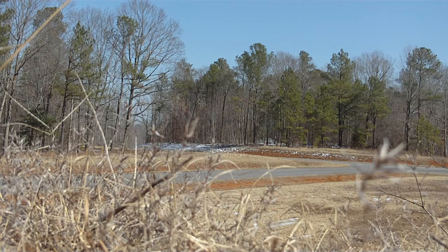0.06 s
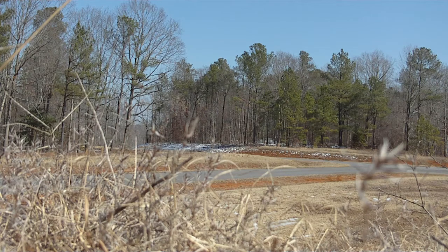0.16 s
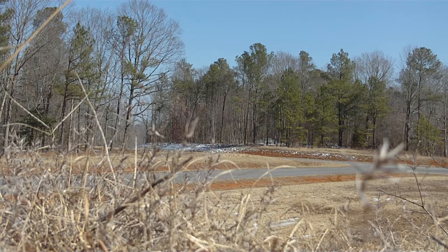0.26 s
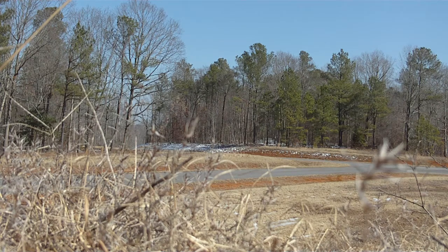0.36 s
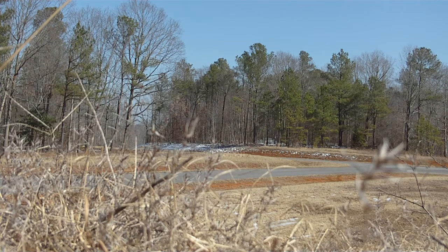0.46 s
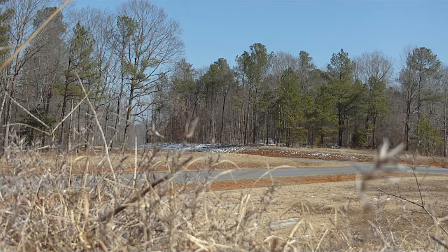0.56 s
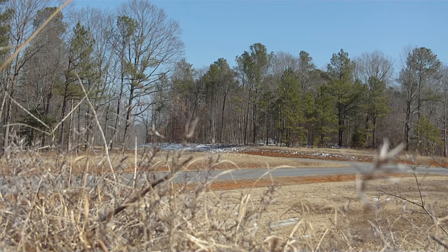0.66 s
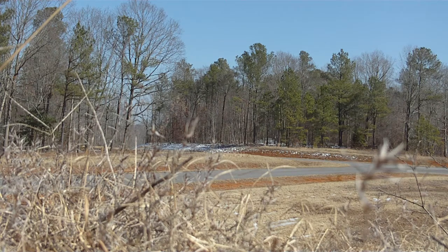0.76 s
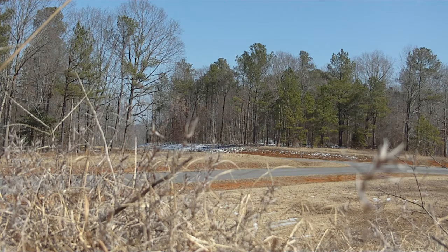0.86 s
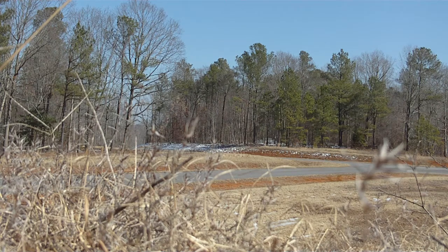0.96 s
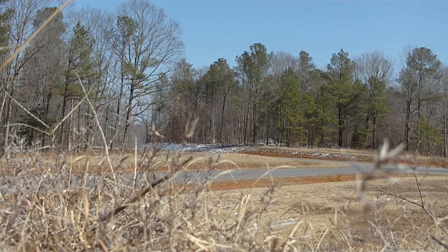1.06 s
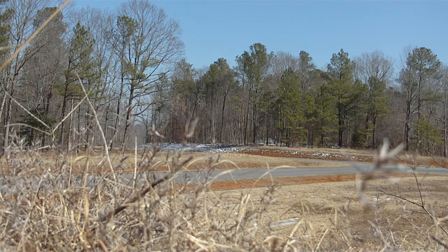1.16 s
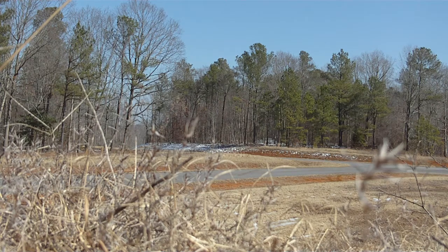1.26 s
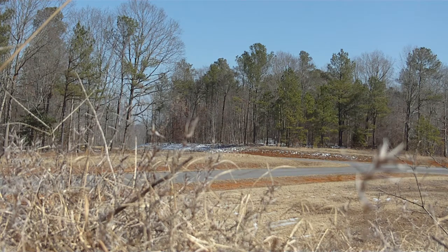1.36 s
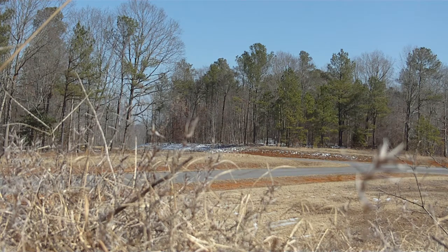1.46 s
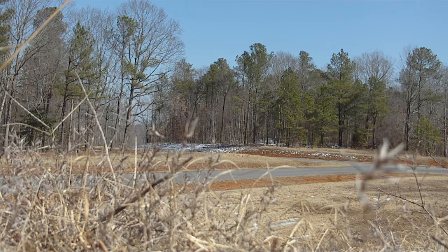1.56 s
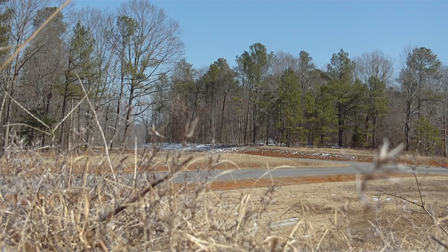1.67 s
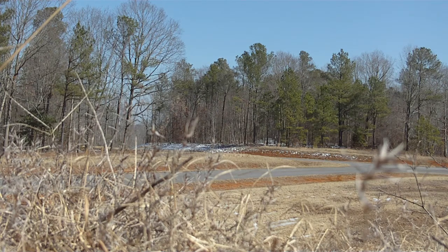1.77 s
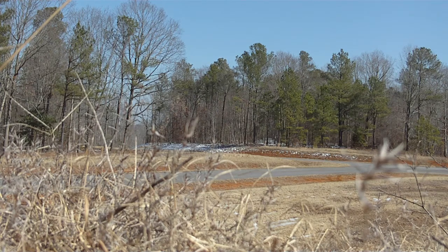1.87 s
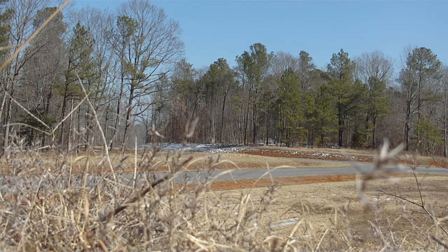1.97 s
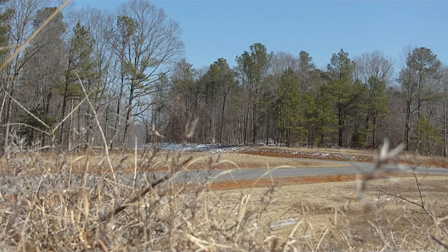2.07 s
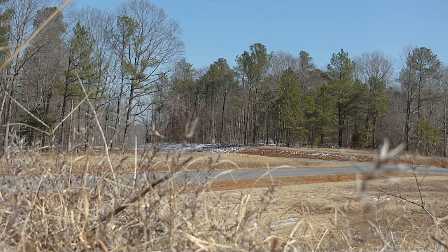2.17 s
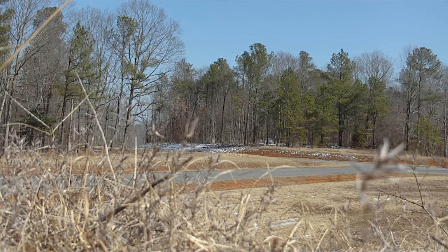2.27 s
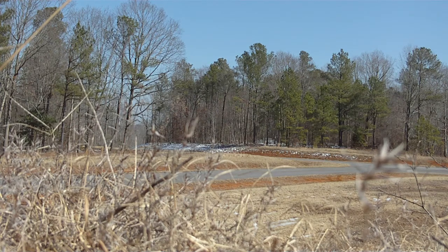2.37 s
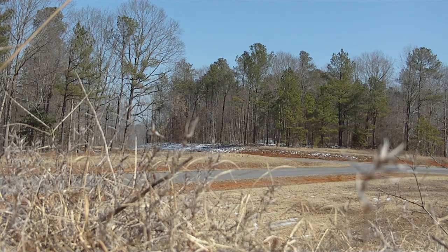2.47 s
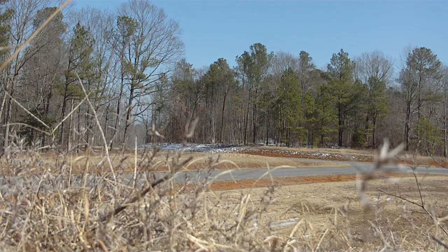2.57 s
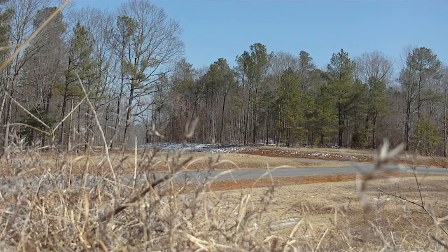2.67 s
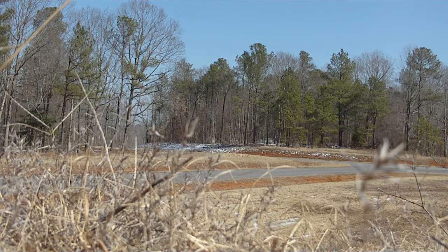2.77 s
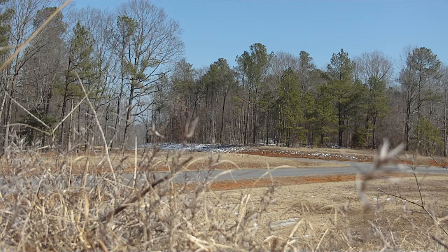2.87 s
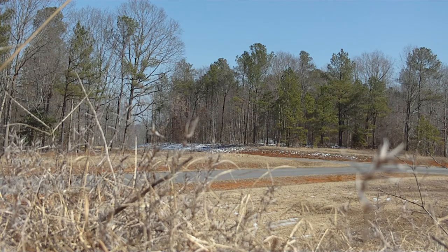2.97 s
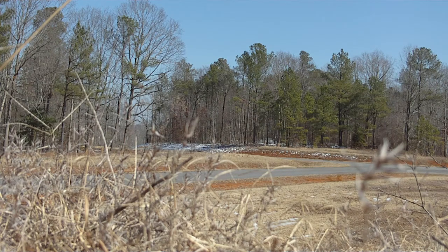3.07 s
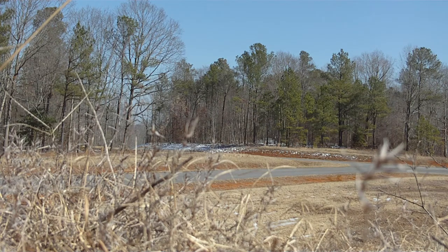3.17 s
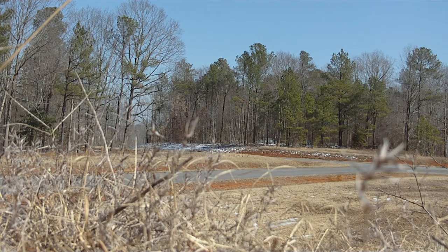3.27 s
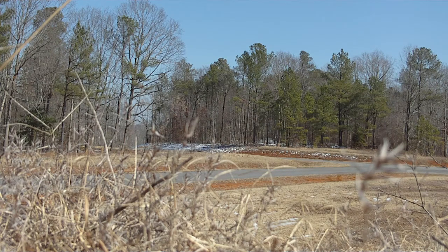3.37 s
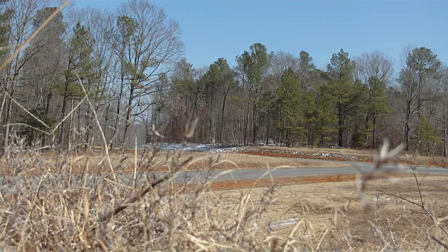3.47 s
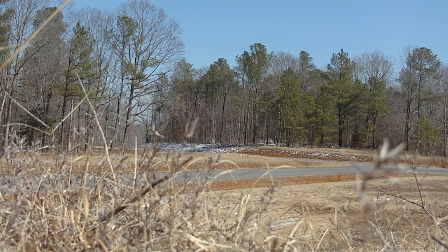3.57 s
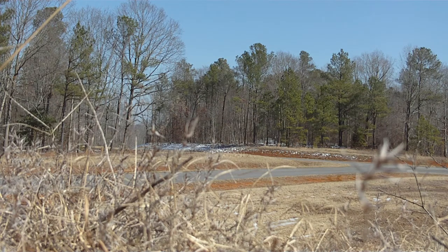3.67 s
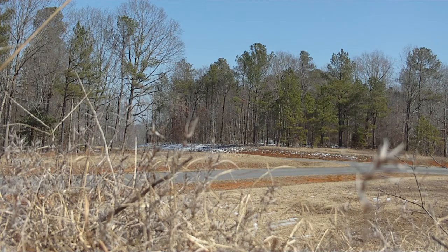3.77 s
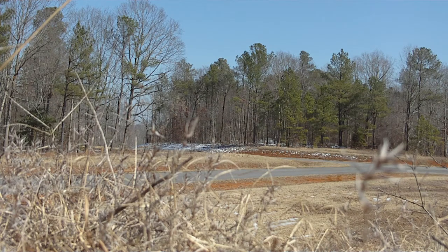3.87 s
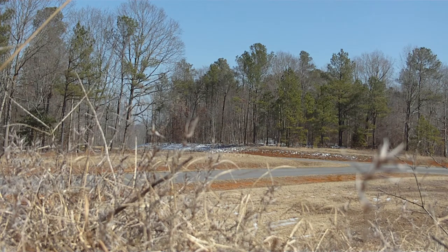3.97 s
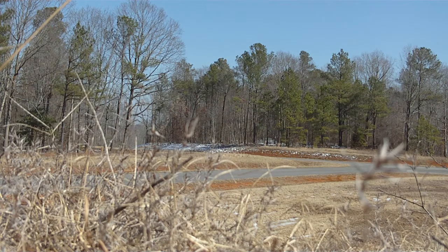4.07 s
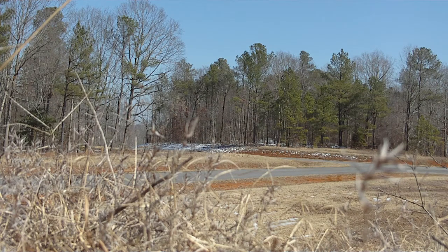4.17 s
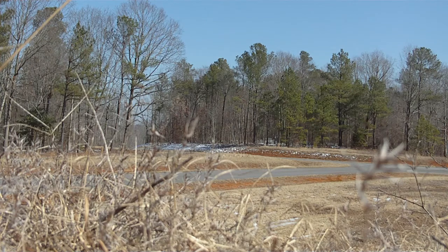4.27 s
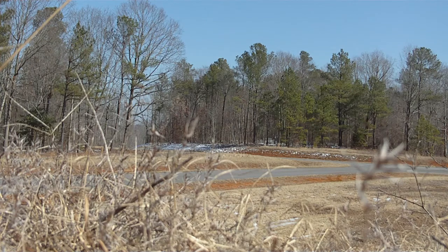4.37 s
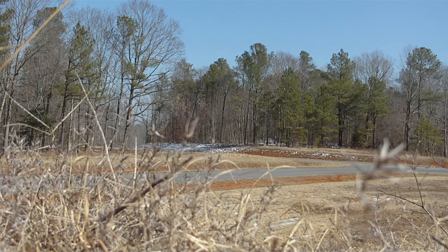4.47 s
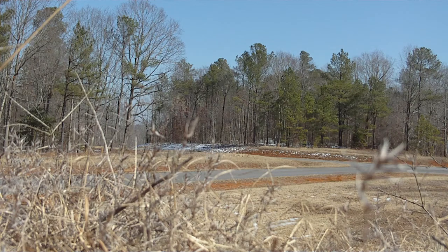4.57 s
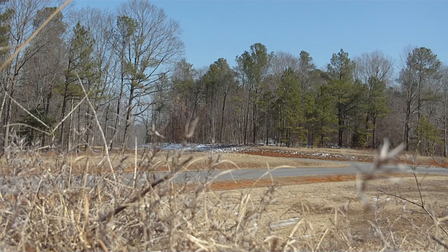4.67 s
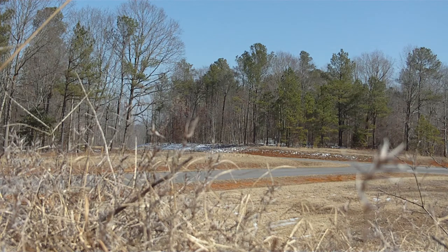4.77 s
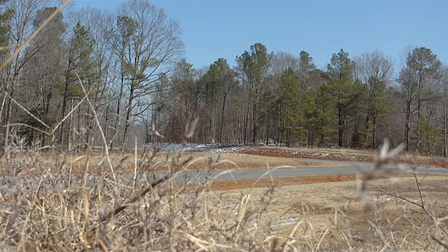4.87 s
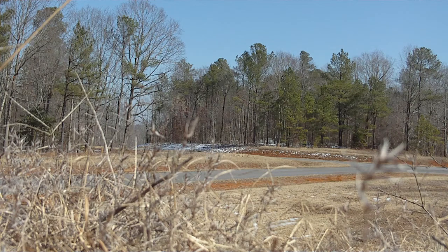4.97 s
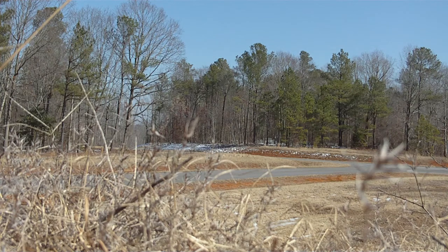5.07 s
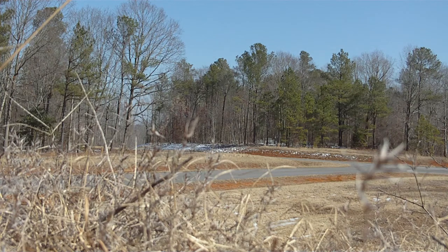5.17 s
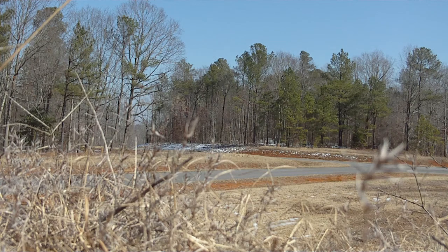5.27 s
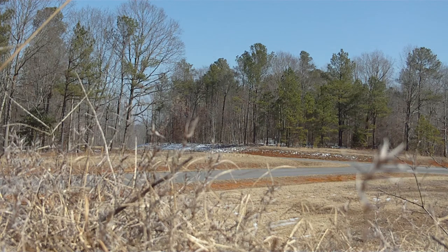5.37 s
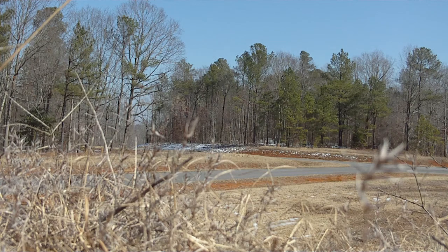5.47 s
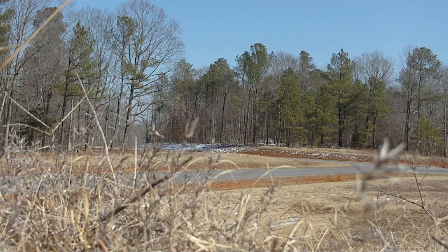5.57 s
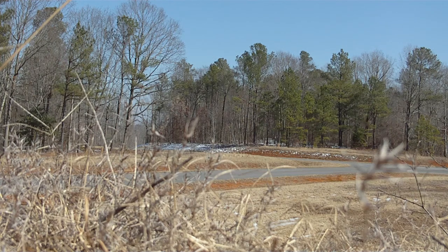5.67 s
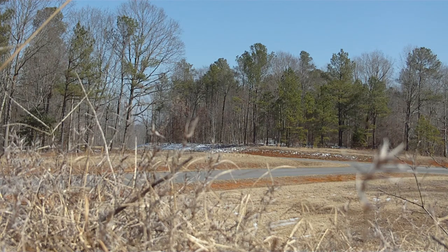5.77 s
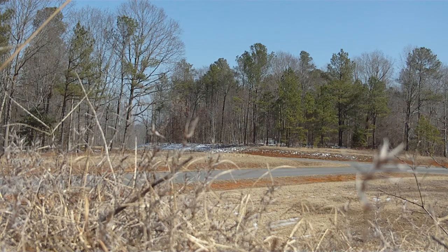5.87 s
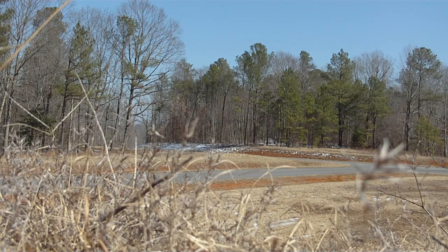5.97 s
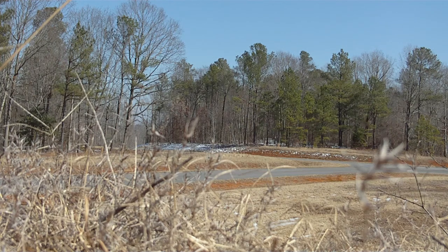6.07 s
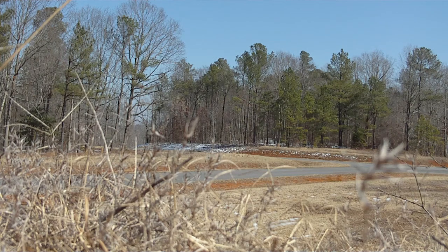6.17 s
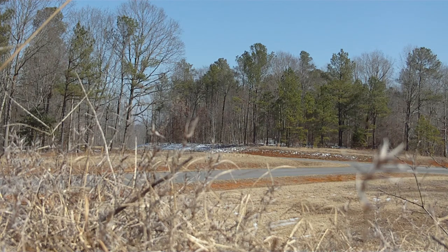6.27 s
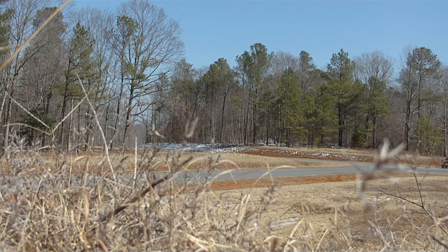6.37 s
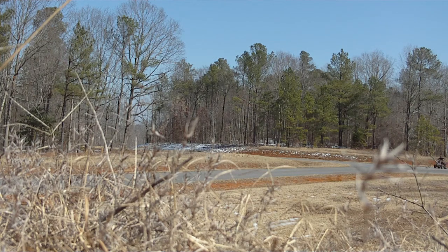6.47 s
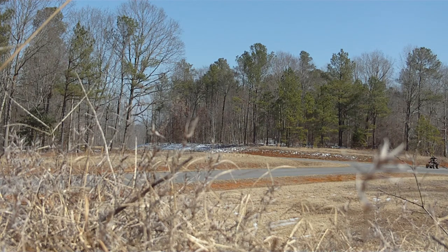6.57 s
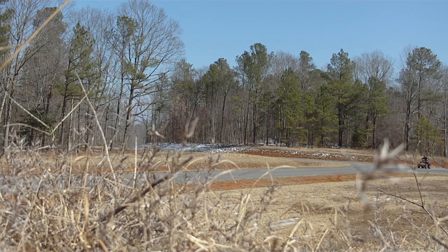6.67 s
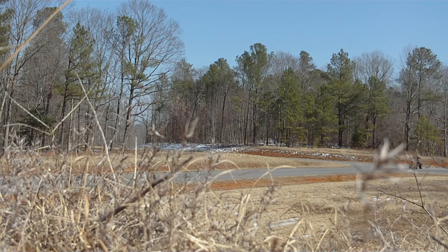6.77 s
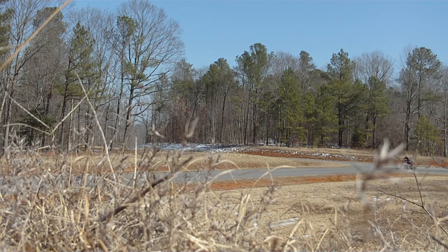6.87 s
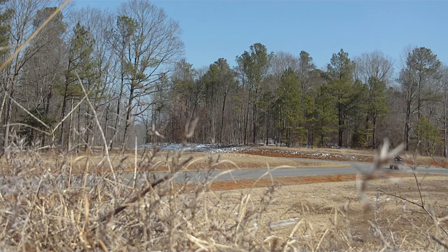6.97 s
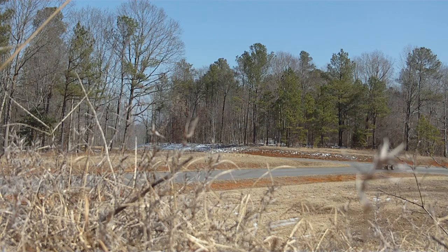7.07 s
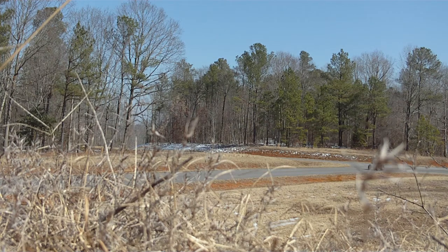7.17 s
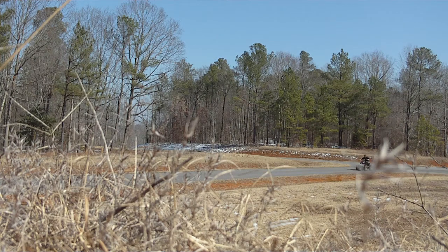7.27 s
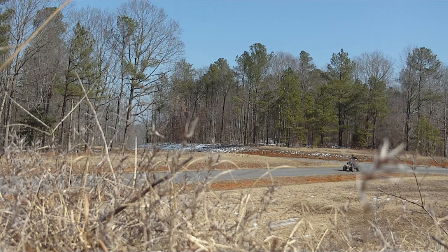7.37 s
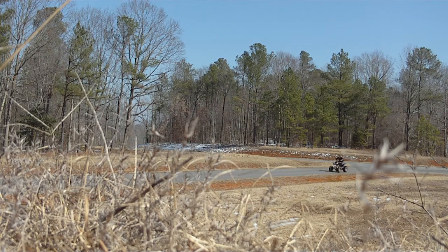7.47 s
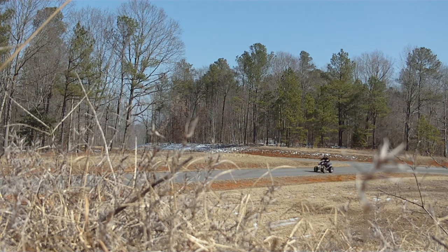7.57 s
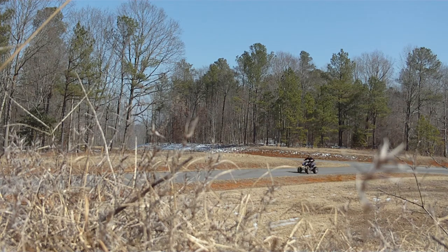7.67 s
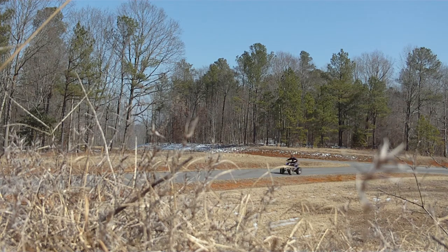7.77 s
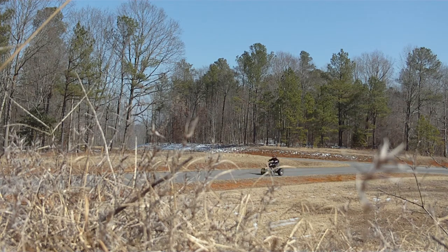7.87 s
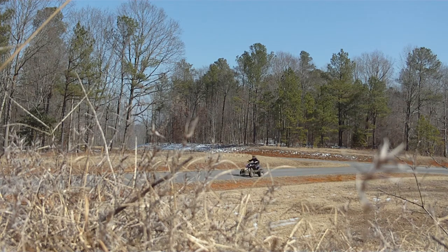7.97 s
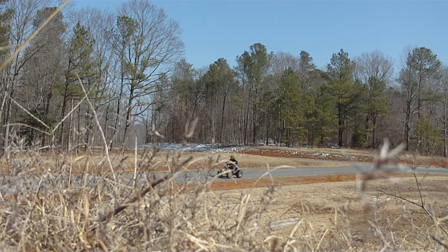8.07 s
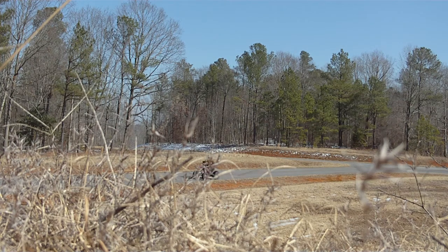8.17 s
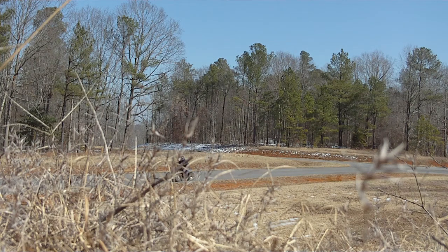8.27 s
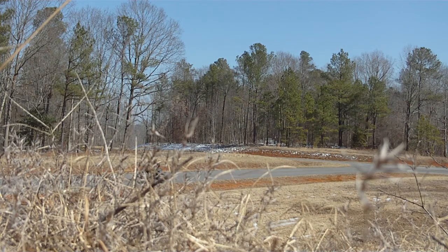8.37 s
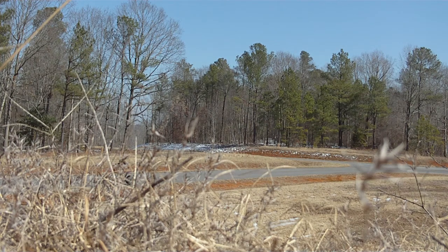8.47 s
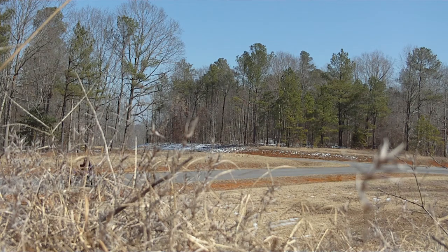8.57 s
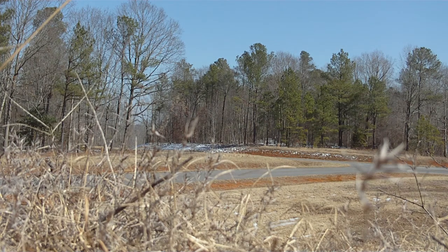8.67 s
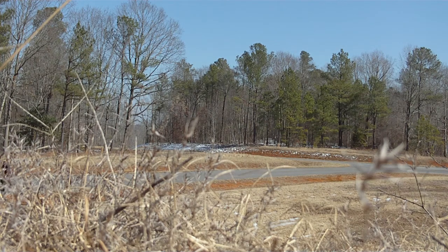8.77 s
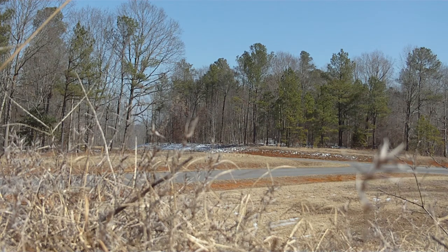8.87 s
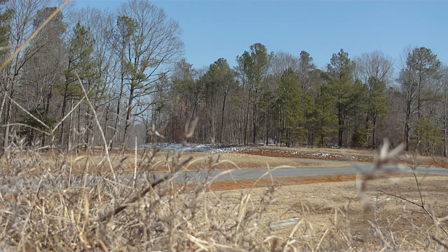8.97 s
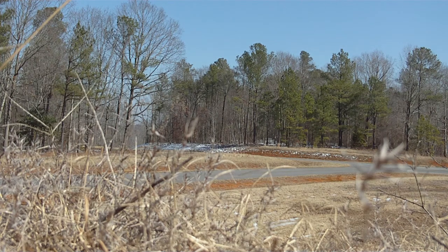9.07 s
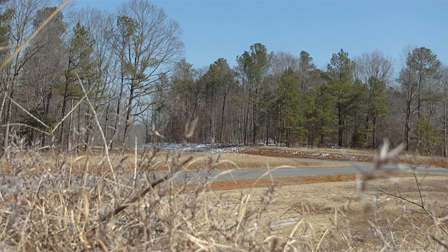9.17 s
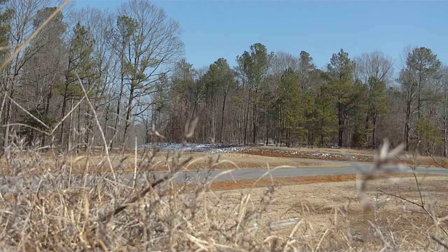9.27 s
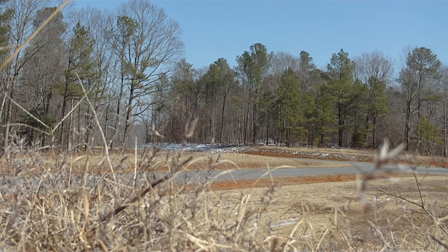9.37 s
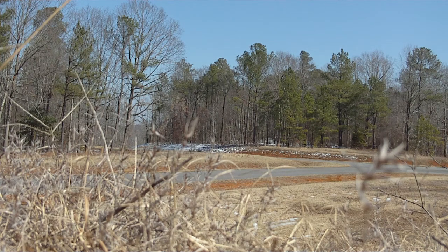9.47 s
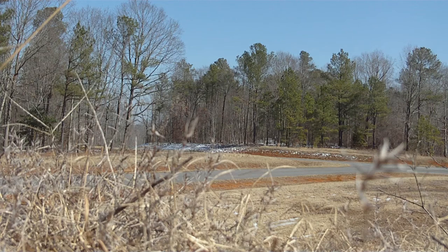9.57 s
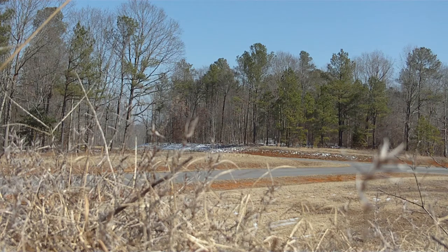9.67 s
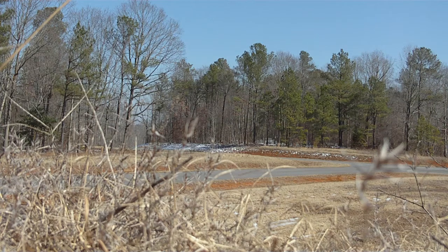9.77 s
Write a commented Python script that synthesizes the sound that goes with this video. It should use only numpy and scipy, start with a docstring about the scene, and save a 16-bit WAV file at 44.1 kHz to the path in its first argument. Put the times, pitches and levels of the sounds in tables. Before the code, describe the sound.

Distant quad engine shifts up, swells into a buzzing, rasping drone with humming knobbly tyres, then blasts by ragged and bright as the pitch falls.

```python
"""Two-stroke quad racing past

A single-cylinder quad races toward a roadside listener across a field ringed by trees, and another engine idles
far off. Head-on it changes up a gear and drones cleanly: low sine orders, with coloured gas noise for bark and rasp.
Its knobbly tyres hum at a multiple of the top-gear firing rate. As it draws level, uneven pulses and noise turn
the exhaust ragged and bright, the revs hitch and the pitch falls away."""
import sys
import numpy as np
from scipy import signal
from scipy.fft import rfft, irfft, next_fast_len
from scipy.io import wavfile
from scipy.ndimage import uniform_filter1d

SR = 44100
rng = np.random.default_rng(int(sys.argv[2]) if len(sys.argv) > 2 else 0)


def to_wav(s):
    """Save 16-bit WAV."""
    ch = np.atleast_2d(s).T  # columns
    pcm = np.round(np.clip(ch, -1, 1) * 32767)  # PCM
    wavfile.write(sys.argv[1], SR, pcm.astype(np.int16))


N = 433062
TIME = np.arange(N) / SR

# spectrum of the low outdoor rumble: f/Hz, level/dB
AIR_SPECTRUM = [(20, -4), (45, 2), (80, 0.5), (160, -6.5), (400, -16.5), (900, -21.5), (3000, -42)]
# steady tones of the distant idling engine: f/Hz, level/dB
IDLER_TONES = [(61, -42), (70, -40), (96.5, -45), (114, -53)]
# swell of the idling engine and the rumble: t/s, level/dB
BACKGROUND_SWELL = [(0, 0), (5, 0), (6.5, -2), (8, -8.5), (9.82, 2.5)]
# spectrum of the microphone electronics' hiss: f/Hz, level/dB
MIC_HISS_SPECTRUM = [(1000, -14), (4000, -0.5), (8000, -3), (11000, -0.5), (15000, -4)]
# steady whine of the microphone electronics: f/Hz, level/dB
WHINE_TONES = [(7900, -76.5), (11089, -71.5)]

# firing rate in top gear as the quad comes on, Doppler shift included: t/s, f/Hz
CRUISE_RATE = [(0, 127.6), (2.7, 128.4), (3.2, 129.5), (5.15, 129.6), (5.7, 132.5), (6.1, 133.3),
               (6.53, 131.7), (7.3, 134.5), (7.72, 135.7), (8.1, 136.8), (8.5, 137.3)]
# firing rate as it goes by, falling with two hitches of the revs: t/s, f/Hz
GOING_BY_RATE = [(8.85, 136.9), (8.89, 133.5), (8.98, 131.3), (9.125, 123.4), (9.175, 130.1), (9.26, 126.6),
                 (9.29, 129), (9.46, 119.4), (9.62, 113.7), (9.82, 108.7)]
# the revs flare and the pipe barks when the load drops, at the clutch or over a bump:
# t/s, rise/Hz, extra bark/dB
REV_FLARES = [(.68, 18.2, 1.5), (4.4, 1.001, 1), (5.42, 2.5, 1), (5.78, 5.9, 3), (6.27, 2, 2),
              (7.49, 5.6, 5.5)]
# how near the quad is, as loudness against its closest point: t/s, level/dB
NEARNESS_CURVE = [(0, -17.5), (1.2, -17.5), (2.7, -13.5), (4.3, -11.5), (5.1, -8), (5.6, -5), (6.3, -3),
                  (7.2, -.7), (8.8, 0)]

# tread hum, a row per order, before the wheels' own levels: level at the closest point/dB,
# gain per dB of nearness/dB, change after the last bump/dB, level going by/dB
TREAD_LEVELS = [(-30, 0.6, -4.5, -32.5), (-36.5, 1.5, 8, -31.5), (-34, 1.48, -1, -23)]

# drone, a row per engine order, before its colouring: level at the closest point/dB, gain per dB of nearness/dB
DRONE_LEVELS = [(-17.5, 0.92), (-19, .96), (-26.5, 1.6), (-29.5, 1.47)]
# the ground reflection colours the drone:
# t/s, weight moved from the second order to the first/dB, lift of the third order/dB
GROUND_COLOUR = [(0, 1, 4), (1.4, 0.5, -1.5), (2.7, 0.3, 1.5), (4.2, -.1, 0), (4.9, -3, -1), (5.5, 0, 1),
                 (6.8, -1.7, 0), (7.5, 0.1, -1), (7.9, -0.4, 1), (8.25, 2.5, 2.3), (8.8, 0.5, 1)]
# upper engine orders before the resonances: order, level head-on/dB, level from beside/dB
UPPER_ORDER_LEVELS = [(9, 2, 0.5), (10, 0, -2), (11, -3, 4), (12, 1.5, -10), (13, 1, -0.5), (14, 3, -4),
                      (15, 3.5, -6), (16, 1, 7.5), (17, 2, -15), (18, -1, 6), (19, 2.5, -4), (20, -2, 5.5),
                      (21, -5, 0), (22, 1, 4.5), (23, -3, 0), (24, -8, -10), (25, 3.5, 2)]

# head-on spectra of the pipe's bark, the metallic rasp, and the tyre and chain hiss: f/Hz, level/dB
BARK_AHEAD_SPECTRUM = [(30, -14), (60, -6), (170, -3), (250, 2.5), (320, 0.5), (450, 6), (580, -1.5),
                       (710, 3.5), (790, -8.5), (1000, -15.5), (1300, -28)]
RASP_AHEAD_SPECTRUM = [(900, -7), (1100, -3.5), (1230, -0.5), (1420, 3.5), (1550, 1), (1670, 1.5),
                       (1900, -3.5), (2150, -1.5), (2380, 3), (2700, -2.5), (3000, -5), (3350, -17),
                       (4000, -15.5), (4600, -30)]
HISS_AHEAD_SPECTRUM = [(2650, -33), (4500, -4.5), (4950, -2), (5690, -2.5), (6100, -7), (6590, 1),
                       (7520, 0.5), (7930, -1), (8570, -10.5), (10100, -13), (12000, -28), (15600, -53),
                       (22000, -120)]
# rasp on the approach, before its treble lift: t/s, level/dB
RASP_CURVE = [(0.1, -57.5), (0.72, -53.5), (4.77, -45), (4.79, -44), (5.73, -41.5), (6.92, -34.5),
              (7.88, -35.5), (7.96, -32.5), (8.7, -33)]
# tilt of the rasp about 2 kHz as the cylinder comes into the open: t/s, treble over bass/dB
RASP_TREBLE_LIFT = [(0, -7), (1.2, -4), (3, -2.5), (5, -1), (6, -4), (7, 3), (7.6, 4), (8.1, 4), (8.8, 7)]
# tyre and chain hiss on the approach, before its trim and distance loss: t/s, level/dB
HISS_CURVE = [(5.5, -67), (5.96, -64), (6.13, -56), (6.34, -63.5), (7.08, -49), (7.19, -52.5), (7.57, -51),
              (8.31, -53), (8.8, -52)]

# spectra from beside, from the pipe's boom up to the hiss: f/Hz, level/dB
BOOM_BESIDE_SPECTRUM = [(60, -16), (110, -8), (175, -16), (230, 0), (280, -2), (330, 2.5), (385, -5),
                        (440, 0), (520, -9), (620, -27)]
BARK_BESIDE_SPECTRUM = [(480, -19), (570, -2), (640, 7), (720, 4), (790, -1), (930, -6), (1080, -19),
                        (1300, -33)]
RASP_BESIDE_SPECTRUM = [(950, -21), (1100, -2), (1250, -4), (1400, 2), (1520, 3), (1680, 3), (1820, 1),
                        (1980, -15), (2200, -13)]
RING_BESIDE_SPECTRUM = [(1950, -17), (2120, -2), (2350, 4), (2560, 1.5), (2700, -4), (2900, -0.5),
                        (3200, -6.5), (3700, -10), (4400, -29), (4800, -35)]
HISS_BESIDE_SPECTRUM = [(2650, -30), (4500, -9.5), (4730, -18), (5310, -1.5), (5560, 2.5), (6430, -9.5),
                        (7640, -3), (7990, -8.5), (8490, -16.5), (11500, -25), (12000, -34), (13700, -30),
                        (15000, -38)]

# the change up: the throttle shuts for a moment, the revs sink, and the drone jumps as the clutch bites again
SHIFT_AT_S, SHIFT_WIDTH_S, SHIFT_DIP_DB = 0.555, 0.052, -19
LOW_GEAR_RATIO, IN_GEAR_AT_S, SETTLE_S = 1.16, 0.78, 0.09
BITE_AFTER_S, BITE_WIDTH_S, BITE_DB = 0.12, 0.08, 3
LOW_GEAR_OVERTONE_DB = -6   # the second order is weaker in the lower gear
FLARE_RISE_S, FLARE_FALL_S, FLARE_BARK_S = 0.055, 0.1, 0.44
# the middle of the drone swells; close by, the fourth order sinks into the ground reflection's notch
SURGE_AT_S, SURGE_WIDTH_S, SURGE_DB = 5.48, 0.39, 3.5
NOTCH_AT_S, NOTCH_WIDTH_S, NOTCH_DB = 8.7, 0.6, -10
# the pass: side-on, the throttle eases and reopens, then the tailpipe turns to the listener
LEVEL_AT_S = 8.86
EASE_AT_S, EASE_WIDTH_S = 9.08, 0.059
REOPEN_AT_S, REOPEN_WIDTH_S, REOPEN_DB = 9.22, 0.068, 2.5
TAIL_ON_AT_S, TURN_S = 9.46, 0.2
BEHIND_PITCH = 0.954   # the Doppler shift lowers the pipe's boom as the quad leaves
# tyre knobs slap the road at a multiple of the top-gear firing rate; going by, their pitch falls
KNOBS_PER_FIRING, DOPPLER_FALL, DOPPLER_S = 1.782, 0.235, 1.2
BUMP_AT_S, BUMP_WIDTH_S = 7.62, 0.1
TREAD_FROM_S, TREAD_FADE_S, TREAD_FAINT_DB = 1.1, 0.13, -17   # the hum's lowest order is faint at first
DIRECT_SHARE = 0.62   # share of the rasp's power that arrives as clean orders at the closest point
CLEAN_BESIDE = 0.6    # the same share for rasp and ring from beside
LEFT_AGAINST_RIGHT_DB = -9
CUTOFF_HZ = 15300


def from_db(db):
    """Decibels to gain."""
    return 10 ** (np.asarray(db) / 20)


def rms_one(x):
    """Scale to rms 1."""
    return x / np.sqrt(np.mean(x ** 2) + 1e-20)


def in_time(rows):
    """Each column of a curve table at every sample."""
    s, *columns = np.transpose(rows)
    return [np.interp(TIME, s, c) for c in columns]


def swell(at_s, width_s):
    """A bell in time, height 1."""
    return np.exp(-((TIME - at_s) / width_s) ** 2)


def step(at_s, width_s):
    """A smooth change from 0 to 1."""
    return 0.5 + 0.5 * np.tanh((TIME - at_s) / width_s)


def noise():
    """White noise."""
    return rng.standard_normal(N)


def drift(rate):
    """Smooth chance, changing about rate times a second; spread 1."""
    hop = 40   # samples between the slow points
    r = np.exp(-2 * np.pi * rate * hop / SR)
    chance = rng.standard_normal(N // hop + 2002)
    slow = signal.lfilter([1], [1, -2 * r, r * r], chance)[2000:]   # drop the filter's start-up
    return np.interp(np.arange(N) / hop, np.arange(len(slow)), rms_one(slow))


def colour(x, spectrum):
    """Give x a spectrum whose ends fall away steeply; rms 1."""
    size = next_fast_len(N + 8192)
    hz, db = np.transpose(spectrum)
    octave = np.log2(np.arange(size // 2 + 1) * SR / size + 1)
    points = np.log2(hz)
    outside = np.abs(octave - np.clip(octave, points[0], points[-1]))
    gain = from_db(np.interp(octave, points, db) - 17 * outside)   # 17 dB per octave beyond the ends
    return rms_one(irfft(rfft(x, size) * gain, size)[:N])


def blend(a, b, share):
    """Mix two sounds, with a share of the power from the first."""
    share = np.clip(share, 0, 1)
    return np.sqrt(share) * a + np.sqrt(1 - share) * b


def tone(turns, db):
    """A sine at an rms level."""
    return from_db(db) * np.sqrt(2) * np.sin(2 * np.pi * turns)


def electronics():
    """Faint hiss and whine of the microphone's electronics, the hiss part shared and part separate per side."""
    whine = sum(tone(hz * TIME, db) for hz, db in WHINE_TONES)
    separate = np.array([colour(noise(), MIC_HISS_SPECTRUM) for side in range(2)])
    shared = colour(noise(), MIC_HISS_SPECTRUM)
    return from_db(-62) * (separate + shared) + whine


def field():
    """Low outdoor rumble as coloured noise, and a distant idling engine as gently swaying sines."""
    swell_db, = in_time(BACKGROUND_SWELL)
    hum = sum(tone(hz * TIME + 0.39 * drift(1), db + 0.7 * drift(1.9)) for hz, db in IDLER_TONES)
    rumble = from_db(-38) * colour(noise(), AIR_SPECTRUM)
    return from_db(swell_db) * (hum + rumble)


def nearing(closest_db, follows):
    """Level of a layer that grows as the quad comes nearer."""
    near_db, = in_time(NEARNESS_CURVE)
    return closest_db + follows * near_db


def passing(side_db, behind_db, eased_db):
    """Level of a layer as the quad turns from side-on to tail-on, changed by eased_db while the throttle eases."""
    turning_db = (behind_db - side_db) * step(TAIL_ON_AT_S, TURN_S)
    return side_db + turning_db + eased_db * swell(EASE_AT_S, EASE_WIDTH_S)


def tread():
    """Knobbly tyres hum; front and rear wheels turn at slightly different, unsteady rates."""
    cruise, = in_time(CRUISE_RATE)
    doppler = 1 - DOPPLER_FALL * np.tanh(np.maximum(TIME - LEVEL_AT_S, 0) / DOPPLER_S)
    knobs = np.cumsum(KNOBS_PER_FIRING * cruise * doppler) / SR
    gone_by = step(8.93, 0.065)
    after_bump = step(BUMP_AT_S, BUMP_WIDTH_S)
    levels = []
    for closest_db, follows, bump_db, by_db in TREAD_LEVELS:
        coming_db = nearing(closest_db, follows) + bump_db * after_bump
        levels.append(coming_db * (1 - gone_by) + by_db * gone_by)
    levels[0] = levels[0] + TREAD_FAINT_DB * (1 - step(TREAD_FROM_S, TREAD_FADE_S))
    hum = 0
    for ratio, wheel_db, slip in [(1, -1.5, 0.026), (1.014, -8.5, 0.1)]:
        turns = ratio * knobs + slip * drift(10.2)
        for k, db in enumerate(levels, 1):
            hum = hum + tone(k * turns, db + wheel_db + 1.9 * drift(12.3))
    return hum


def low_gear():
    """1 in the lower gear, 0 once the revs have settled in top."""
    return 1 - step(IN_GEAR_AT_S, SETTLE_S)


def firing_rate():
    """Top-gear firing rate times the gear, plus flares that jump up and die away, in Hz."""
    rate, = in_time(CRUISE_RATE + GOING_BY_RATE)
    rate = rate * (1 + (LOW_GEAR_RATIO - 1) * low_gear())
    for s, rise_hz, _ in REV_FLARES:
        fall = np.exp(-np.abs(TIME - s) / FLARE_FALL_S)
        rate = rate + rise_hz * np.where(TIME < s, swell(s, FLARE_RISE_S), fall)
    return rate


def firings(turns, uneven_db, jitter_ms):
    """One pressure pulse a turn, each a little off in strength and timing."""
    chance = rng.standard_normal((2048, 2))
    whole = np.arange(1, int(turns[-1]))
    at = np.interp(whole, turns, np.arange(N)) + chance[whole, 0] * jitter_ms * SR / 1000
    at = np.clip(at, 0, N - 2)
    strength = from_db(uneven_db * chance[whole, 1])
    # share each pulse between the two nearest samples
    early, part = at.astype(int), at % 1
    pulses = np.bincount(early, strength * (1 - part), N) + np.bincount(early + 1, strength * part, N)
    return rms_one(pulses)


def puffs(turns, depth):
    """Turbulent gas noise that swells each time the exhaust port opens."""
    return rms_one(noise() * np.exp(depth * np.cos(2 * np.pi * turns)))


def upper_orders(turns, levels_db):
    """The sharp edge of each firing as a comb of orders, smeared in phase and fading over the changing ground path."""
    return [tone(k * turns + rng.random() + 0.06 * drift(17), db + 2.5 * drift(3.6))
            for k, db in enumerate(levels_db, 9)]


def scatter(x, t60, wet):
    """Brush and trunks return a thin, dying cloud of reflections."""
    t = TIME[:SR // 2]
    cloud = rng.standard_normal(len(t)) * from_db(-60 * t / t60) * (t > 0.004)
    return blend(x, signal.fftconvolve(x, cloud / np.linalg.norm(cloud))[:N], wet)


def hiss_ahead(turns):
    """Tyre and chain hiss as noise, pulsed at the firing rate; it does not carry far."""
    hiss_db, = in_time(HISS_CURVE)
    distance_db = np.minimum(nearing(5.3, 0.55), 0)
    level_db = hiss_db + 0.5 + distance_db + 1.34 * drift(11)
    return from_db(level_db) * colour(puffs(turns, depth=0.15), HISS_AHEAD_SPECTRUM)


def rasp_ahead(turns):
    """Metallic rasp: clean orders emerge from gas noise as the quad nears, and the treble opens up."""
    rasp_db, = in_time(RASP_CURVE)
    lift_db, = in_time(RASP_TREBLE_LIFT)
    direct = DIRECT_SHARE * from_db(nearing(0, 1))
    comb = rms_one(sum(upper_orders(turns, [row[1] for row in UPPER_ORDER_LEVELS])))
    gas = colour(puffs(turns, depth=0.067), RASP_AHEAD_SPECTRUM)
    rasp = blend(colour(comb, RASP_AHEAD_SPECTRUM), gas, direct)
    dull = signal.sosfiltfilt(signal.butter(2, 2000, fs=SR, output="sos"), rasp)
    tilted = from_db(-lift_db / 2) * dull + from_db(lift_db / 2) * (rasp - dull)
    return from_db(rasp_db + 0.5 * drift(8.3)) * tilted


def bark_ahead(turns):
    """Pipe bark: gas noise through the pipe's resonances, louder around each flare of the revs."""
    flare_db = sum(db * swell(s, FLARE_BARK_S) for s, _, db in REV_FLARES)
    bark_db = nearing(-31, 0.86) + flare_db
    return from_db(bark_db) * colour(puffs(turns, depth=0.089), BARK_AHEAD_SPECTRUM)


def drone(turns):
    """The four lowest orders of the exhaust as sines, shimmering in the air."""
    first_db, second_db, third_db, fourth_db = [nearing(*order) for order in DRONE_LEVELS]
    tilt_db, third_lift_db = in_time(GROUND_COLOUR)
    shift_db = SHIFT_DIP_DB * swell(SHIFT_AT_S, SHIFT_WIDTH_S)
    bite_db = BITE_DB * swell(SHIFT_AT_S + BITE_AFTER_S, BITE_WIDTH_S)
    surge_db = SURGE_DB * swell(SURGE_AT_S, SURGE_WIDTH_S)
    notch_db = NOTCH_DB * swell(NOTCH_AT_S, NOTCH_WIDTH_S)
    first_db = first_db + tilt_db + shift_db + bite_db
    second_db = second_db - tilt_db + LOW_GEAR_OVERTONE_DB * low_gear()
    levels = [first_db, second_db, third_db + third_lift_db + surge_db, fourth_db + surge_db + notch_db]
    shimmer_db = np.interp(TIME, [0, 5, 8], [0.7, 0.5, 0.35])
    wobble = 0.0057 * drift(23)
    first, *upper = [tone(k * (turns + wobble), db + shimmer_db * drift(13)) for k, db in enumerate(levels, 1)]
    # until the revs settle on the pipe's tuning, its resonances ring roughly instead of locking to the orders
    locked = np.clip((TIME - 0.8) / 0.26, 0, 1)
    resonances = [(274, 0.13, second_db + 0.5), (432, 0.18, third_db + 1)]
    loose = sum(tone(hz * TIME + sway * drift(21), db + 2 * drift(15)) for hz, sway, db in resonances)
    return first + blend(sum(upper), loose, locked)


def going_by(turns):
    """Beside and behind the open pipe: ragged firings ring the exhaust and the cylinder fins."""
    ragged = blend(firings(turns, uneven_db=3, jitter_ms=0.34), puffs(turns, depth=0.44), 0.75)
    # trees behind return it flat
    echo = firings(0.92 * turns + 0.052 * drift(8.7), uneven_db=3.5, jitter_ms=0.12)
    pipe = blend(scatter(ragged, t60=0.16, wet=0.27), echo, 0.65)

    behind = step(TAIL_ON_AT_S, TURN_S)
    lowered = [(BEHIND_PITCH * hz, db) for hz, db in BOOM_BESIDE_SPECTRUM]
    boom = (1 - behind) * colour(pipe, BOOM_BESIDE_SPECTRUM) + behind * colour(pipe, lowered)
    bark = colour(pipe, BARK_BESIDE_SPECTRUM)

    orders = upper_orders(turns, [row[2] for row in UPPER_ORDER_LEVELS])
    low, high = sum(orders[:9]), sum(orders[7:])
    rasp_gas = colour(puffs(turns, depth=0.16), RASP_BESIDE_SPECTRUM)
    rasp = blend(colour(low, RASP_BESIDE_SPECTRUM), rasp_gas, CLEAN_BESIDE)
    ring_gas = colour(puffs(turns, depth=0.11), RING_BESIDE_SPECTRUM)
    ring = blend(colour(high, RING_BESIDE_SPECTRUM), ring_gas, CLEAN_BESIDE)
    hiss = colour(puffs(turns, depth=0.23), HISS_BESIDE_SPECTRUM)

    boom_db = passing(side_db=-21.5, behind_db=-21.5, eased_db=5.47)
    reopen_db = REOPEN_DB * swell(REOPEN_AT_S, REOPEN_WIDTH_S)   # rasp and ring flare with the throttle
    layers = [(boom, boom_db),
              (bark, passing(side_db=-27.5, behind_db=-22.5, eased_db=0.91)),
              (rasp, passing(side_db=-29.5, behind_db=-31.5, eased_db=-3.5) + reopen_db),
              (ring, passing(side_db=-27, behind_db=-38, eased_db=-2) + reopen_db),
              (hiss, passing(side_db=-44, behind_db=-43.5, eased_db=-1) + 1.2 * drift(22))]
    first = tone(turns, passing(side_db=-25.5, behind_db=-21.5, eased_db=-14) + 2.4 * drift(22))
    second = tone(2 * turns + 0.12 * drift(25), boom_db - 7.5 + 2.2 * drift(18))
    out = first + second
    for sound, db in layers:
        running_rms = np.sqrt(uniform_filter1d(sound ** 2, size=6000) + 1e-6)
        out = out + from_db(db) * sound / running_rms
    return out


def scene():
    """The quad and the field, louder on the right, over the microphone's faint hiss and whine."""
    turns = np.cumsum(firing_rate()) / SR
    beside = step(LEVEL_AT_S, 0.016)
    head_on = 1 - step(LEVEL_AT_S - 0.0076, 0.013)   # the drone gives way slightly earlier
    approach = hiss_ahead(turns) + rasp_ahead(turns) + bark_ahead(turns)
    engine = head_on * drone(turns) + (1 - beside) * approach + beside * going_by(turns)
    sound = field() + tread() + engine
    sides = from_db([[LEFT_AGAINST_RIGHT_DB], [0]])
    return sound * sides / sides.mean() + electronics()


def record(dry):
    """Rare peaks are rounded and the top is cut steeply."""
    top = 0.92   # full scale is 1
    rounded = dry / (1 + (dry / top) ** 8) ** (1 / 8)
    steep_cut = signal.ellip(10, 0.1, 80, CUTOFF_HZ, fs=SR, output="sos")
    return signal.sosfilt(steep_cut, rounded)


dry = scene()
out = record(dry)
to_wav(out)
```